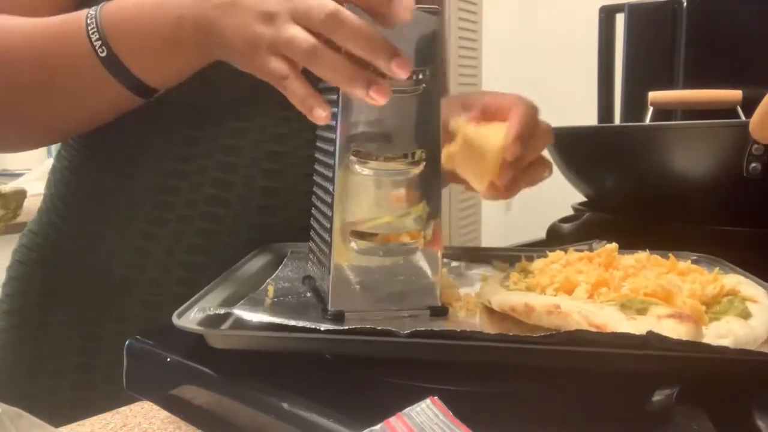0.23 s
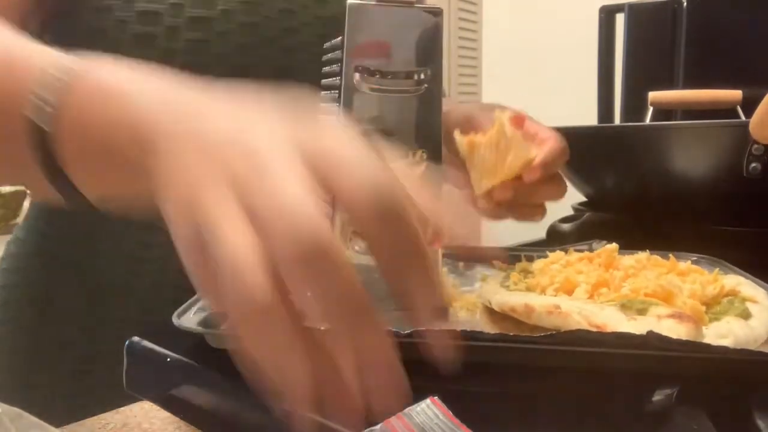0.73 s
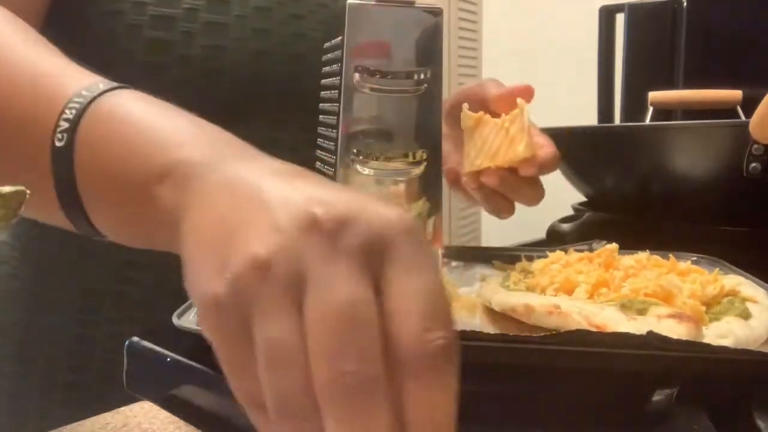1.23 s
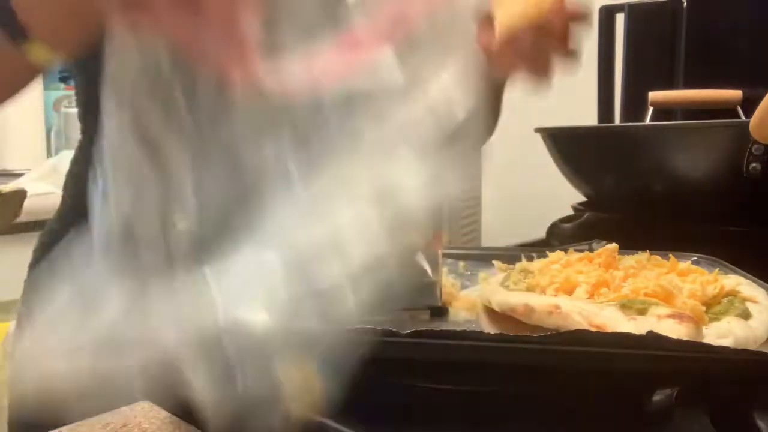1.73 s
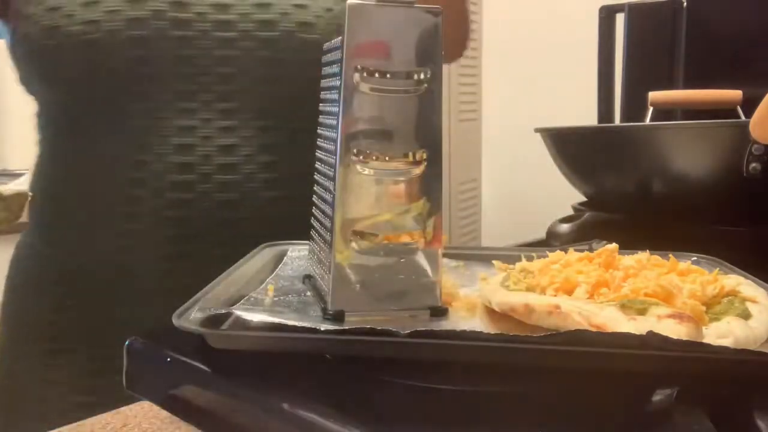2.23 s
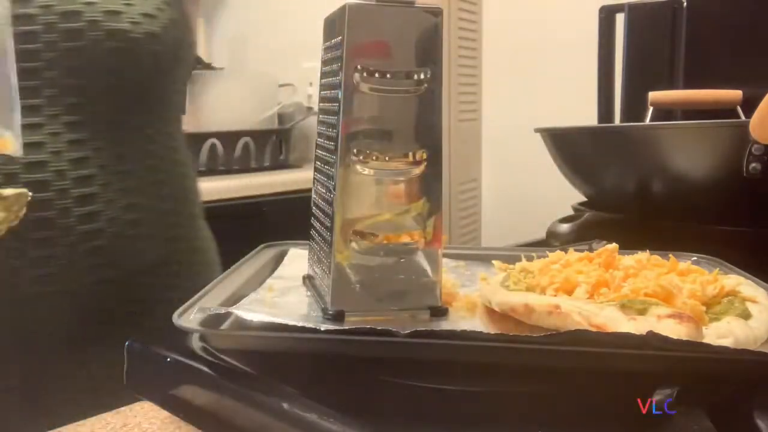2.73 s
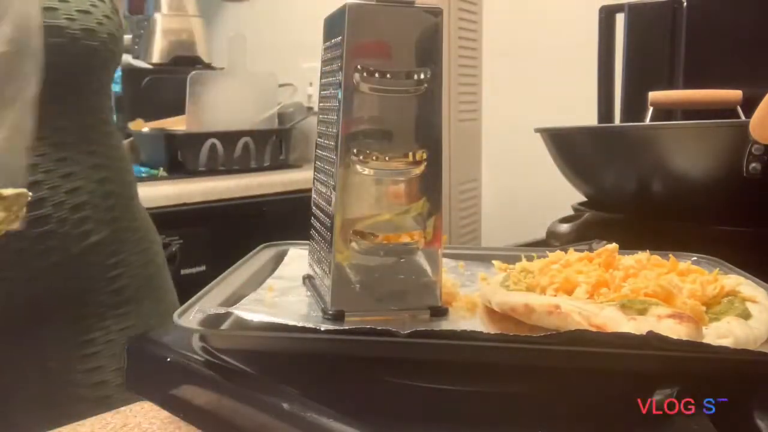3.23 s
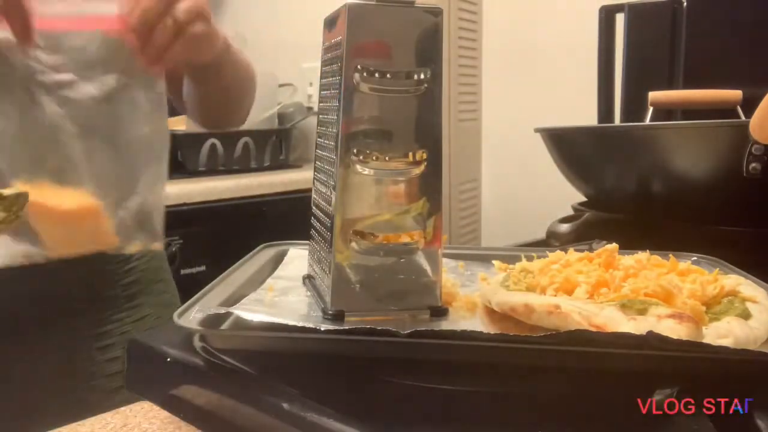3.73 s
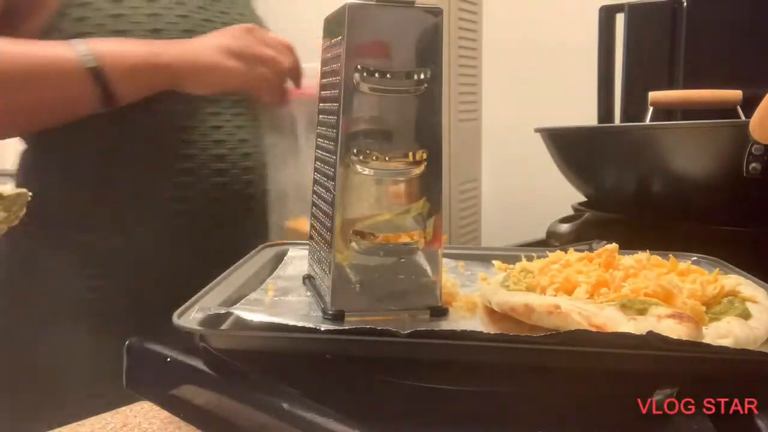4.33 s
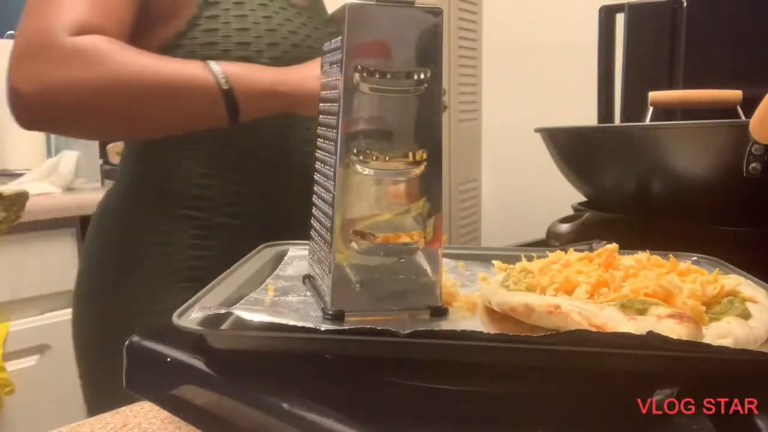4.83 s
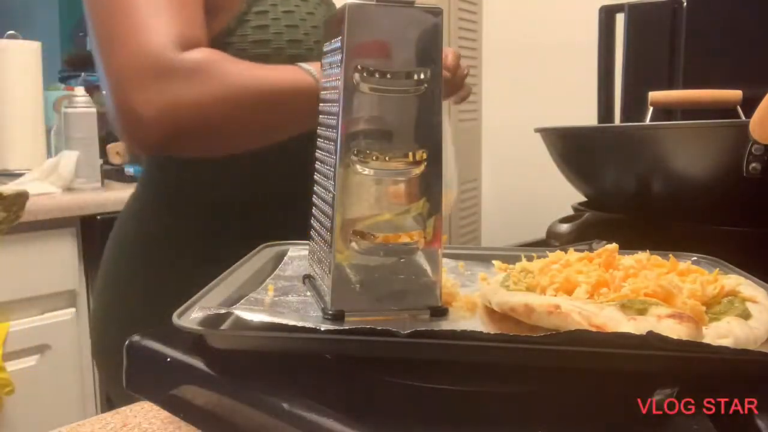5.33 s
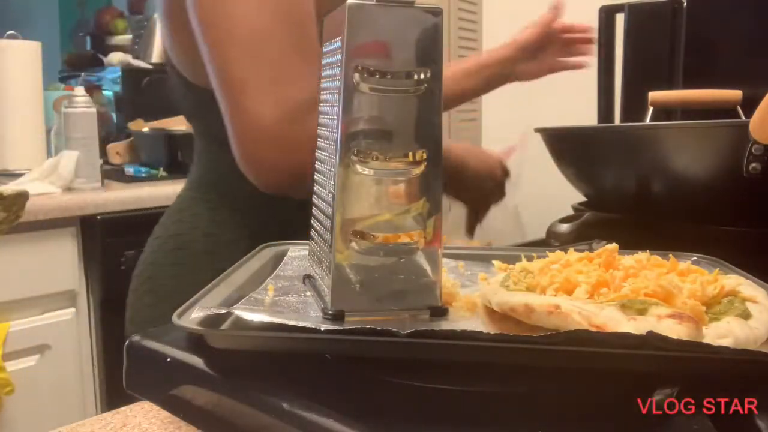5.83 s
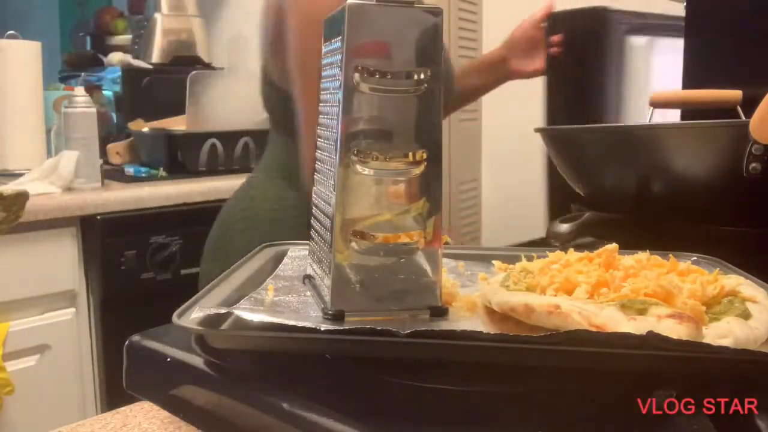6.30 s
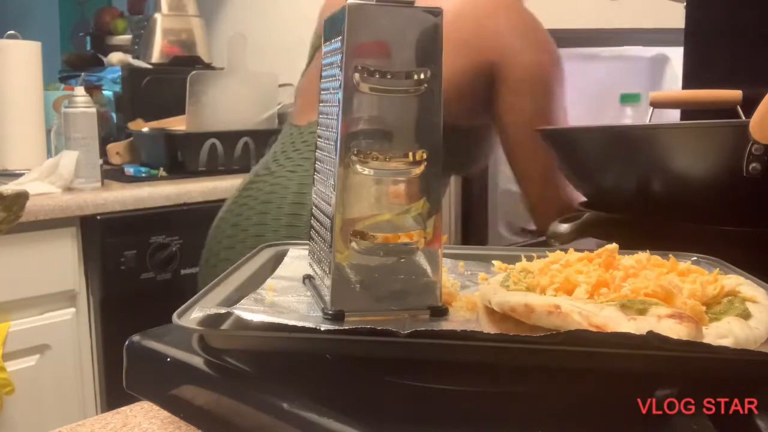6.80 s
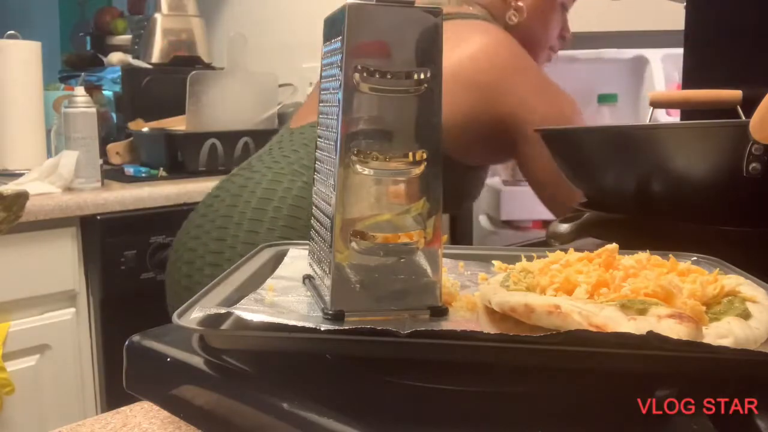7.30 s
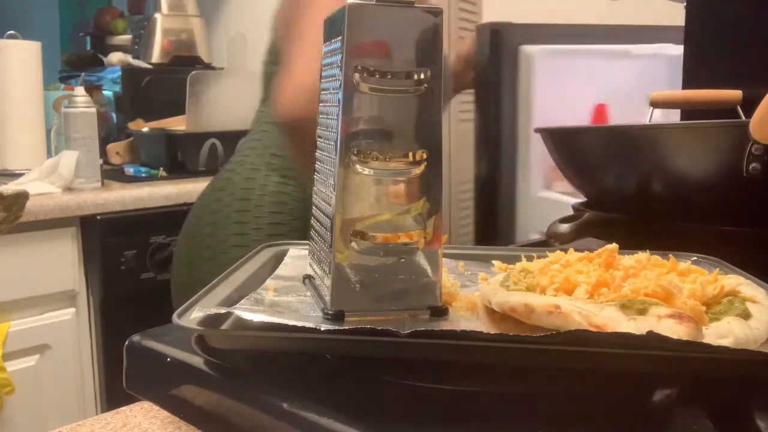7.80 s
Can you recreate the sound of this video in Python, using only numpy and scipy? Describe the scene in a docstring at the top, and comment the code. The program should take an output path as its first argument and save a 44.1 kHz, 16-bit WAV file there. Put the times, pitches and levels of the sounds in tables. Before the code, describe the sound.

Two close microphones catch half a second of uneven, scratchy grating on thin steel and small baking tray bumps. Then crisp plastic crackling dominates: gripping, a strong airy flap with a low jolt, and scattered sharp snaps and papery pops. The bag moves farther off into short kitchen reflections. Near the end a fridge cabinet booms and rattles, soft rustling follows, then a deep bump and blunt clunks.

```python
"""A plastic zip bag is picked up, shaken open, loaded with cheese and pinched shut: filtered streams of crease
ticks, cracking snaps, flapping walls and low jolts. Ahead of it come a few rasping strokes on a steel box
grater, noise pulsed by its teeth, and knocks of the baking tray, a set of damped modes. Later the fridge is
opened and the bag put away, with booming cabinet modes, rattles and dull clunks. A small kitchen adds
decaying reflections, over low rumble and still air, heard by two close microphones."""
import sys
import numpy as np
from scipy import signal
from scipy.fft import rfft, irfft, next_fast_len
from scipy.io import wavfile

SR = 44100
rng = np.random.default_rng(int(sys.argv[2]) if len(sys.argv) > 2 else 0)


def waveform_to_disk(signal):
    """Save audio, clipped to [-1, 1], as 16-bit WAV at the path in sys.argv[1]."""
    frames = np.transpose(np.atleast_2d(signal))
    scaled = np.clip(frames, -1, 1) * 32767
    samples = np.round(scaled).astype(np.int16)
    wavfile.write(sys.argv[1], SR, samples)


N = 355181
TIME = np.arange(N) / SR  # s
PADDED = next_fast_len(N + SR, True)
FREQ = np.maximum(np.arange(PADDED // 2 + 1) * SR / PADDED, 1)  # Hz

# spectrum of low movement in floor, worktop and wafted air: f/Hz, level/dB
BOARD_SPECTRUM = [(25, -22), (55, 4.5), (110, 1), (170, -4), (320, -8.5), (480, -23.5), (4000, -42.5)]
# close by, single creases stand out; further off they merge: t/s, base crease rate/(1/s), room over direct/dB
BAG_DISTANCE = [(1.7, 510, -12.5), (2.4, 380, -6), (4.8, 450, 0.5), (6.6, 5200, -3.5)]


def undb(db):
    """Decibels to gain."""
    return 10 ** (np.asarray(db) / 20)


def unit(x):
    """Scale to rms 1."""
    return x / np.sqrt(np.mean(x ** 2) + 1e-20)


def curves(table):
    """Each column of a timed table, sample by sample."""
    s, *columns = np.transpose(table)
    return [np.interp(TIME, s, c) for c in columns]


def on_log(hz, points):
    """Read (Hz, value) points on a log-frequency axis."""
    f, value = np.transpose(points)
    return np.interp(np.log(hz), np.log(f), value)


def colour(x, points):
    """Minimum-phase filter with the given spectrum shape; white noise keeps its level."""
    cepstrum = irfft(np.log(unit(undb(on_log(FREQ, points)))))
    # folding the cepstrum makes the filter causal
    cepstrum[1:PADDED // 2] *= 2
    cepstrum[PADDED // 2 + 1:] = 0
    response = np.exp(rfft(cepstrum))
    return irfft(rfft(x, PADDED) * response)[..., :N]


def lowpass(x, hz, order=1):
    """Gentle loss of treble."""
    return signal.sosfilt(signal.butter(order, min(hz, SR / 2 - 1), fs=SR, output="sos"), x)


def highpass(x, hz, order):
    """Loss of bass."""
    return signal.sosfilt(signal.butter(order, hz, "high", fs=SR, output="sos"), x)


def resonate(x, hz, q):
    """One resonance, gain 1 at its centre."""
    return signal.lfilter(*signal.iirpeak(min(hz, SR / 2 - 1), max(q, 1), fs=SR), x)


def fade(t, t60):
    """Falls 60 dB in t60 seconds."""
    return np.exp(-np.log(1000) * t / t60)


def walk(hz):
    """Slow random drift with rms 1, moving no faster than about hz."""
    return unit(lowpass(rng.standard_normal(N), hz, order=2))


def burst(swell_s, t60):
    """Stereo noise that swells and dies away."""
    t = TIME[:int((swell_s + t60) * SR) + 2]
    noise = rng.standard_normal((2, SR))[:, :len(t)]
    swell = np.minimum(t / swell_s, 1)
    return noise * swell * fade(np.maximum(t - swell_s, 0), t60)


def add(track, s, x):
    """Mix x into the track at s seconds."""
    i = max(int(s * SR), 0)
    track[:, i:i + x.shape[-1]] += x[..., :max(N - i, 0)]


def knock(modes, hz, q, clatter, dense_db, dense_t60):
    """A push rings the main modes and a wash of small ones; soft contact dulls it, loose parts keep nudging it."""
    t = TIME[:SR // 2]
    ring = 0
    for (f, db), (detune, size) in zip(modes, rng.standard_normal((len(modes), 2))):
        # damping grows with the root of frequency; q holds at the lowest mode
        decay = np.exp(-np.pi * np.sqrt(f * modes[0][0]) * t / q)
        ring = ring + undb(db + 2 * size) * np.cos(2 * np.pi * f * (1 + 0.017 * detune) * t) * decay
    push = clatter * burst(0.0055, 0.069)
    push[:, 0] += 1
    main = signal.fftconvolve(push, ring[None])[:, :len(t)]
    wash = lowpass(rng.standard_normal(main.shape) * fade(t, dense_t60), 2 * hz, order=2)
    struck = lowpass(unit(main) + undb(dense_db) * unit(wash), hz)
    return unit(struck) / np.sqrt(50)  # as much energy as 10 ms at rms 1


def background(rumble_db=6, air_db=-74):
    """Low rumble of someone moving about, over the still air of the room; both are filtered noise."""
    # rumble in floor and worktop, before the rumble_db gain: t/s, level/dB
    rumble_course = [(0.0, -42), (0.22, -47.5), (0.69, -62.5), (1.6, -48), (4.06, -59.5), (5.9, -67),
                     (6.12, -38.5), (6.45, -51.5), (6.75, -46), (7.4, -54.5)]
    db, = curves(rumble_course)
    rumble = colour(rng.standard_normal((2, N)) * undb(db + rumble_db), BOARD_SPECTRUM)
    air = unit(lowpass(rng.standard_normal((2, N)), 200))
    return rumble + undb(air_db) * air


def kitchen(x, seconds=0.33):
    """Diffuse reflections off cupboards and walls: noise that decays octave by octave."""
    # decay time of the room: f/Hz, T60/s
    room_decay = [(100, 0.44), (15000, 0.3)]
    t = TIME[:int(min(seconds, 1) * SR)]
    noise = rng.standard_normal((2, SR))[:, :len(t)]
    bins_hz = np.arange(len(t) // 2 + 1) * SR / len(t)
    tail, below = 0, 0
    for hz in SR / 2 / 2 ** np.arange(8)[::-1]:
        upto = irfft(rfft(noise) * (bins_hz <= hz), len(t))
        octave = upto - below
        tail = tail + octave * fade(t, on_log(hz / np.sqrt(2), room_decay))
        below = upto
    tail = tail * (1 - np.exp(-t / 0.00085))  # reflections build up over about a millisecond
    return signal.fftconvolve(x, unit(tail) / np.sqrt(len(t)), axes=1)[:, :N]


def ring_along(x, q=34):
    """Hollow metal and nearby surfaces ring along with every sound as narrow resonances."""
    # resonances of the surroundings: f/Hz, level/dB
    surroundings = [(540, 4), (790, -15), (1370, -5), (2150, -7)]
    return x + sum(undb(db) * resonate(x, hz, q) for hz, db in surroundings)


def microphones(x):
    """The two ports hear alike in some bands and apart in others, with a phase lead on the left."""
    # likeness of the ports: f/Hz, correlation (0-1), left lead/rad
    ports = [(162, 0.9, 0), (448, 0.2, 2.5), (783, 0.72, 4), (2000, 0.2, -1.5), (5500, 0.25, 2),
             (8500, .93, 3.1), (10400, .7, 4.6), (11900, .96, 6.2), (13300, .95, 6.4), (15300, .6, 9.2)]
    # balance of the ports: f/Hz, left minus right/dB
    balance = [(130, -2.5), (260, 2.5), (550, 2), (3500, -.5)]
    hz, likeness, lead = np.transpose(ports)
    likeness = np.clip(np.interp(FREQ, hz, likeness), 0, 1)
    lead = np.interp(FREQ, hz, lead)
    a, b = rfft(x, PADDED)
    common = (a + b) * np.sqrt(1 + likeness) / 2
    apart = (a - b) * np.sqrt(1 - likeness) / 2
    left_gain = undb(on_log(FREQ, balance) / 2)
    left = (common + apart) * left_gain
    right = (common - apart) * np.exp(-1j * lead) / left_gain
    return irfft(np.array([left, right]))[:, :N]


def clunks(swell_s=0.0031, t60=0.4, slower_per_db=1.1):
    """Things set down and nudged: blunt noise bursts, little treble; the gentler, the slower they swell."""
    # dull contacts: t/s, level/dB
    contacts = [(5.155, -53), (6.13, -31.5), (7.68, -46), (7.744, -31.5), (7.892, -35.5)]
    # their colour: f/Hz, level/dB
    clunk_spectrum = [(150, 3), (320, 17), (520, -4.5), (1200, 1), (2400, -10.5), (3500, -14.5),
                      (12000, -36)]
    out, loudest = np.zeros((2, N)), max(db for _, db in contacts)
    for s, db in contacts:
        slower = undb(slower_per_db * (loudest - db))
        add(out, s, undb(db) * burst(swell_s * slower, t60))
    return colour(out, clunk_spectrum)


def fridge(q=9, clatter=0.067, dense_db=-9, dense_t60=0.34, thin=0.2,
           bounce_s=0.011, bounce_db=-1.0, rattle_t60=0.054, count=4):
    """The cabinet booms at each tug and bump, with less bass for a sharp contact; things on its shelves bounce."""
    # bumps of door and shelves: t/s, level/dB, contact lowpass f/Hz
    cabinet_bumps = [(5.795, -33, 400), (5.935, -32, 110), (5.99, -27.5, 293), (6.017, -20.5, 596),
                     (6.044, -17.5, 503), (6.127, -17.5, 179), (6.163, -25.5, 220), (6.655, -26, 380),
                     (7.177, -14.5, 116), (7.746, -25.5, 800)]
    # cabinet modes: f/Hz, level/dB
    cabinet_modes = [(62, -6.5), (78, -15.5), (111, 8.5), (130, 5.5), (163, 1.5), (205, 5), (250, 0),
                     (311, 1.5)]
    # clatter of things in the door: t/s, level/dB
    door_rattles = [(6.017, -24.5), (6.16, -53), (7.742, -44)]
    # its colour: f/Hz, level/dB
    rattle_spectrum = [(300, -22), (1000, -1), (1700, -7), (2400, 9.5), (3200, -9.5), (15000, -14)]
    boom, rattle = np.zeros((2, 2, N))
    for s, db, hz in cabinet_bumps:
        x = undb(db) * knock(cabinet_modes, hz, q, clatter, dense_db, dense_t60)
        add(boom, s, x - lowpass(x, thin * hz))
    for s, db in door_rattles:
        for k in range(count):
            bounce_time = s + k * bounce_s * rng.uniform(0.64, 1.2)
            add(rattle, bounce_time, undb(db + k * bounce_db) * burst(0.0021, rattle_t60))
    return boom + colour(rattle, rattle_spectrum)


def tray(q=10, clatter=0.13, dense_db=-3, dense_t60=0.29):
    """Grater and hand bump the baking tray and the worktop under it, and short damped modes ring."""
    # bumps: t/s, level/dB, contact lowpass f/Hz
    bumps = [(0.019, -31, 362), (0.163, -38, 704), (.250, -26.5, 2380), (0.275, -32.5, 1500),
             (1.621, -32, 900), (1.79, -33, 500)]
    # tray modes: f/Hz, level/dB
    tray_modes = [(130, -2.5), (190, -1.5), (290, 4), (390, 4), (800, 7), (1250, -1), (1750, 5)]
    out = np.zeros((2, N))
    for s, db, hz in bumps:
        add(out, s, undb(db) * knock(tray_modes, hz, q, clatter, dense_db, dense_t60))
    return out


def grater(teeth_hz=420, catch=0.93, stroke_t60=0.155):
    """Rows of teeth catch and let go unevenly; the thin steel makes a broad, bright scrape of it."""
    # strokes over the teeth: t/s, level/dB, swell/s
    strokes = [(.005, -43, 0.0013), (0.076, -40, 0.0017), (0.137, -35.5, 0.003), (0.227, -38.5, 0.0041),
               (0.306, -37, 0.02), (0.497, -27.5, 0.0059)]
    # colour of the thin steel: f/Hz, level/dB
    steel_spectrum = [(200, -20), (700, 0), (1000, -8), (4000, -1), (9000, 5), (14500, 0), (16500, -26)]
    out = np.zeros((2, N))
    # the tooth rate wanders widely about its median, teeth_hz
    tooth_rate = teeth_hz * np.exp(2.1 * unit(lowpass(rng.standard_normal(N), 200)))
    phase = np.cumsum(tooth_rate) / SR % 1
    for s, db, swell_s in strokes:
        add(out, s, undb(db) * burst(swell_s, stroke_t60))
    return colour(out * unit(np.exp(-phase / catch)), steel_spectrum)


def thumps(rise_s=0.0018, t60=0.05, scuff=0.23):
    """Grabbing and shaking the bag: each jolt is a few low cycles with a little dull scuffing."""
    # dull jolts: t/s, level/dB, pitch f/Hz
    jolts = [(0.859, -25.5, 110), (0.945, -24, 131), (1.143, -24, 316), (1.195, -27.5, 184),
             (1.268, -30, 325), (1.526, -29, 190), (2.675, -10.5, 78)]
    out, t = np.zeros((2, N)), TIME[:SR // 2]
    for s, db, hz in jolts:
        scuffing = scuff * lowpass(rng.standard_normal(len(t)), 2 * hz)
        swing = np.sin(2 * np.pi * hz * t) + scuffing
        add(out, s, undb(db) * swing * fade(t, t60) * (1 - np.exp(-t / rise_s)))
    return out


def pop(hz, swell_s=0.00055, t60=0.057, q=6.6):
    """A large dent pops through: a short dry burst, broadly centred on one pitch."""
    return unit(resonate(burst(swell_s, t60), hz, q)) / 2


def flaps(pouch_q=3.1, pouch_hz=440, taut_rise=0.9, slacken_t60=0.3):
    """A wall pulls taut in a rush of noise and rings the pouch, sinking as it slackens; large dents pop through."""
    # flapping walls: t/s, level/dB, swell/s, fade T60/s, pouch resonance level/dB
    wall_flaps = [(1.828, -44.5, 0.0061, 0.43, 14), (2.650, -11, 0.015, 0.12, -18),
                  (3.790, -35.5, 0.0092, 0.08, 10)]
    # colour of the rush: f/Hz, level/dB
    rush_spectrum = [(60, -7), (700, 0), (2300, -1), (8000, -9.5), (13000, -9.5), (16500, -24)]
    # large dents in the film: t/s, level/dB, pitch f/Hz
    large_dents = [(1.109, -43, 810), (1.19, -40.5, 835), (1.459, -37.5, 2290), (2.139, -32, 1610),
                   (2.241, -34.5, 1400), (3.131, -37.5, 2420), (3.189, -38, 2440), (3.294, -36, 2170),
                   (3.427, -31.5, 2230), (5.252, -36.5, 2130)]
    rush, pouch = np.zeros((2, 2, N))
    for s, db, swell_s, t60, pouch_db in wall_flaps:
        x = undb(db) * burst(swell_s, t60)
        add(rush, s, x)
        t = TIME[:x.shape[1]]
        steady = resonate(resonate(x, pouch_hz, pouch_q / 2), pouch_hz, pouch_q / 2)
        # read fast at first, then slower, so the pitch sinks towards pouch_hz
        sinking = np.cumsum(1 + taut_rise * fade(t, slacken_t60)) / SR
        ring = np.array([np.interp(sinking, t, c) for c in steady])
        add(pouch, s, undb(pouch_db) * x.std() * unit(ring))
    for s, db, hz in large_dents:
        add(pouch, s, undb(db) * pop(hz))
    return colour(rush, rush_spectrum) + pouch


def snaps(crack_db=5.5, crack_t60=.007, flutter_db=-5, flutter_per_db=.5, flutter_t60=.05, split_hz=3200):
    """A large crease cracks and the film flutters after it, more so far off; tight creases have less body."""
    # single creases snapping through: t/s, level before crack and flutter gains/dB, body over treble/dB
    large_creases = [(0.912, -40, -14), (0.942, -27, -2), (1.030, -25, -9), (1.142, -28, 7.5),
                     (1.316, -18, -17), (1.363, -21, -8.5), (1.495, -33.5, -18), (1.509, -20, -23),
                     (1.625, -20.5, -27), (1.659, -27, 4), (1.682, -22.5, -12), (1.794, -17, -18),
                     (2.112, -26.5, -3), (2.207, -21.5, -18), (2.391, -28, 5), (2.407, -30.5, 5.5),
                     (2.784, -31.5, -3), (2.912, -35, 0), (3.073, -37, -1), (3.380, -30, -1),
                     (3.417, -28.5, 2), (3.517, -29.5, 5), (3.558, -26, -7), (3.599, -25, -2),
                     (3.798, -32, 5), (3.808, -24.5, 2), (3.947, -38, 11.5), (4.071, -30.5, -1.5),
                     (4.179, -39.5, 9), (4.466, -22, -12.5), (4.555, -28.5, 1), (4.624, -35.5, 10),
                     (4.659, -23.5, -9), (5.008, -25, -7), (5.347, -26, -6), (5.521, -23.5, -12)]
    # their colour: f/Hz, level/dB
    snap_spectrum = [(100, -23), (700, 9.5), (2300, 5), (8000, 3.5), (13000, 4), (16500, -7.5)]
    top, body = np.zeros((2, 2, N))
    _, room_db = curves(BAG_DISTANCE)
    for s, db, body_db in large_creases:
        after_db = flutter_db + flutter_per_db * room_db[int(s * SR)]
        crack = undb(db + crack_db) * burst(0.000067, crack_t60)
        flutter = undb(db + after_db) * burst(0.0029, flutter_t60)
        for x in crack, flutter:
            add(top, s, x)
            add(body, s, undb(body_db) * x)
    treble = highpass(top, split_hz, order=2)
    # second-order halves meet in opposite phase, hence the minus
    return colour(treble - lowpass(body, split_hz, order=2), snap_spectrum)


def crinkle(per_s, spread_db=4, crease_t60=0.01):
    """Tiny creases give dry ticks at random, most weak and a few strong."""
    sizes = undb(spread_db * np.minimum(rng.standard_exponential(N), 3))
    creased = rng.random(N) < per_s / SR
    energy = sizes ** 2 * creased / per_s
    # energy falls twice as fast in dB as amplitude
    decaying = signal.lfilter([1], [1, -fade(2 / SR, crease_t60)], energy + 1e-18)
    return unit(rng.standard_normal((2, N)) * np.sqrt(decaying))


def dents(per_s=55, q=6):
    """Small dents flip now and then: dry, papery ticks, each size with its own colour."""
    # pitches of small dents in the film: f/Hz
    dent_pitches = [1350, 2045, 2420]
    return unit(sum(resonate(crinkle(per_s), hz, q) for hz in dent_pitches))


def handling(attack_s=0.034, release_t60=0.085, sway_crisp_db=-8):
    """Rustle strength of the whole film and of its crisp top: each grip rises, holds and lets go over the sway."""
    # grips, tugs and shoves that crumple the bag: t/s, length/s, level/dB, crispness/dB
    bag_grips = [(0.819, 0.11, -40.5, -3), (0.997, 0.051, -43, 0), (1.274, 0.11, -44.5, 5),
                 (1.453, 0.052, -32, -1), (1.537, 0.041, -37.5, 1), (1.754, 0.097, -40, -6.5),
                 (2.099, 0.16, -37.5, -6.5), (2.542, 0.16, -34, -5.5), (2.733, 0.14, -42, -3.5),
                 (3.09, 0.042, -38.5, -2.5), (3.195, 0.45, -45, -3.5), (3.576, 0.12, -39.5, -7),
                 (3.778, 0.056, -37.5, -8.5), (4.02, 0.095, -45.5, -11), (4.253, 0.21, -48, -4.5),
                 (4.63, 0.12, -43.5, -3), (5.448, 0.12, -41, -4), (5.615, 0.063, -33.5, -2),
                 (5.746, 0.094, -42.5, -2.5), (6.093, 0.12, -46, -2.5), (6.548, 0.24, -49, -0.5),
                 (6.832, 0.043, -42, -4.5), (7.138, 0.073, -37, -3)]
    # between grips the bag sways and whispers: t/s, level/dB
    bag_sway = [(.79, -68.5), (.83, -49), (1.25, -50.5), (1.6, -43), (2.04, -66), (2.09, -44), (2.6, -46.5),
                (2.95, -51), (3.2, -44), (3.7, -52.5), (4.24, -57), (4.5, -51), (4.95, -55.5), (5.1, -48),
                (5.9, -48.5), (6.45, -59), (6.75, -53.5), (7.25, -55.5), (7.65, -69)]
    sway = undb(curves(bag_sway)[0]) * (TIME > bag_sway[0][0])
    film_power, crisp_power = sway ** 2, (sway * undb(sway_crisp_db)) ** 2
    for s, length, db, crisp_db in bag_grips:
        rise = np.clip((TIME - s) / attack_s, 0, 1)
        release = fade(np.clip(TIME - s - length, 0, 1), release_t60)
        grip = undb(db) * rise * release
        film_power = film_power + grip ** 2
        crisp_power = crisp_power + (grip * undb(crisp_db)) ** 2
    return np.sqrt(film_power), np.sqrt(crisp_power)


def bag(cluster_db=4, shimmer_db=1.0, buckle_per_db=0.5, waft_db=-14, dents_db=-4,
        slack_db=-48, hollow_per_db=0.38):
    """Hard handling buckles more creases, in clusters, and wafts air; taut film is crisp, the slack pouch hollow."""
    # colours of film, crisp top and hollow pouch: f/Hz, level/dB
    film_spectrum = [(700, -7), (1350, -1), (2350, 6.5), (3000, 1.5), (4300, 1.5), (7500, -0.5),
                     (12000, -33.5)]
    crisp_spectrum = [(2600, -11), (3800, 2), (10000, 1.5), (14000, 0.5), (16500, -37)]
    hollow_spectrum = [(150, -0.5), (340, 8), (490, -8), (700, 11.5), (1100, 7.5), (1800, -41.5)]
    film, crisp = handling()
    per_s, _ = curves(BAG_DISTANCE)
    effort_db = np.maximum(20 * np.log10(film + 1e-9) - slack_db, -10)
    crowding = undb(buckle_per_db * effort_db + cluster_db * walk(20))
    creases = crinkle(np.maximum(per_s, 1) * crowding)
    # the gentler the handling, the more of the hollow pouch
    hollow = film * undb(-hollow_per_db * effort_db)
    rustle = 0
    for gain, spectrum in (film, film_spectrum), (crisp, crisp_spectrum), (hollow, hollow_spectrum):
        # the folds keep changing shape, so each register swells and sinks on its own
        shimmer = undb(shimmer_db * walk(13.3))
        rustle = rustle + colour(creases * gain * shimmer, spectrum)
    waft = colour(rng.standard_normal((2, N)) * film * undb(waft_db), BOARD_SPECTRUM)
    return waft + undb(dents_db) * film * dents() + rustle


def scene(near_room_db=-11, flap_room_db=-12, fridge_room_db=-7):
    """Grater and tray stand close; the bag's share of room over direct sound shifts as it is carried off."""
    near = grater() + tray()
    plastic = bag() + snaps()
    flap = flaps() + thumps()
    far = fridge() + clunks()
    wet = undb(curves(BAG_DISTANCE)[1])
    plastic = plastic / np.sqrt(1 + wet ** 2)  # direct and room power together stay constant
    to_room = undb(near_room_db) * near + wet * plastic + undb(flap_room_db) * flap + undb(fridge_room_db) * far
    room = kitchen(to_room)
    return microphones(ring_along(near + plastic + flap + far + room) + background())


def record(dry, low_cut_hz=48, top_hz=16500):
    """The recorder drops the deepest bass and cuts the top steeply."""
    thinned = highpass(dry, low_cut_hz, order=3)
    return signal.sosfilt(signal.ellip(8, .2, 70, top_hz, fs=SR, output="sos"), thinned)


dry = scene()
out = record(dry)
waveform_to_disk(out)
```